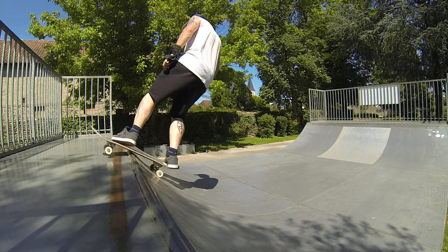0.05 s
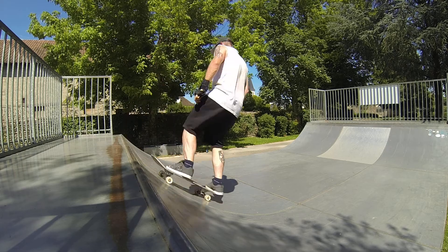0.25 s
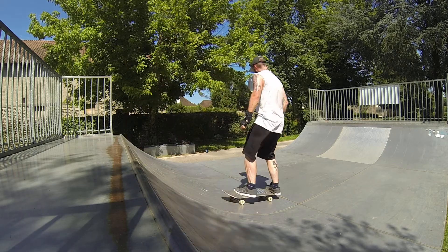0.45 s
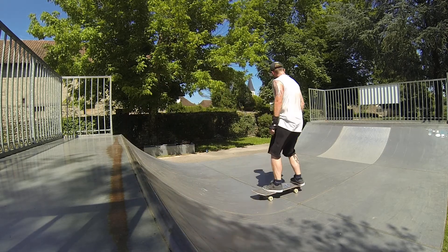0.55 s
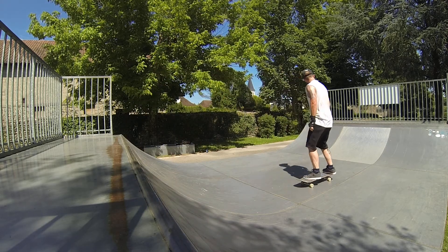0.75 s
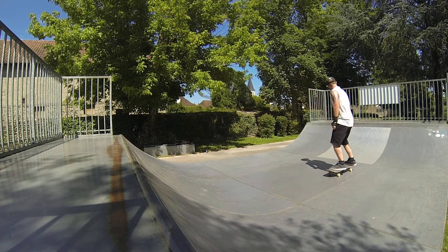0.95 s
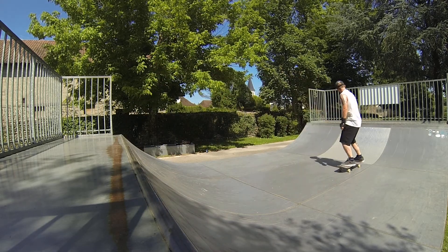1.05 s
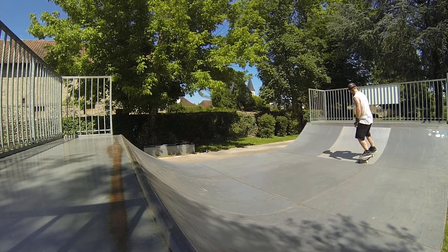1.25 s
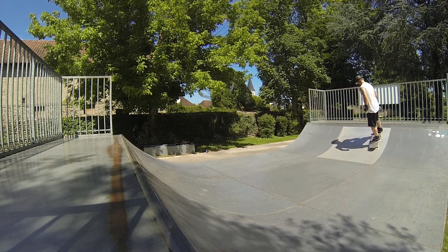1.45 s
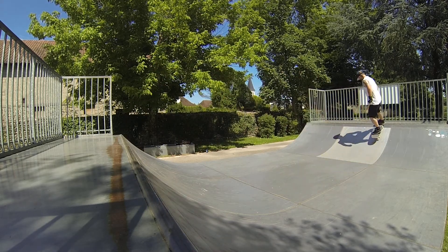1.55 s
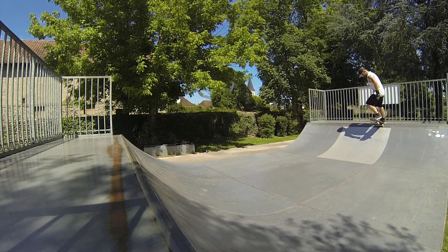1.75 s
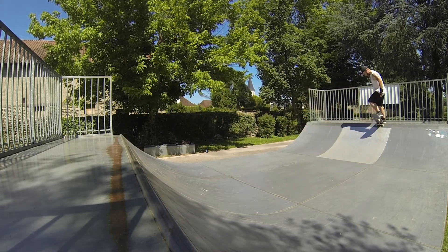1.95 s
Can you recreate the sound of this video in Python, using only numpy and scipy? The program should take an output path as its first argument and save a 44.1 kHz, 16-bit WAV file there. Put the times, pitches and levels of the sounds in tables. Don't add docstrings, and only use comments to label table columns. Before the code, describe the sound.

Skateboard wheels clack over a ramp edge, rumble and whine across the flat, knock and boom at two joints, then hit metal brightly before fading; outdoors with faint leaves, heard through a small camera microphone.

```python
import sys
import numpy as np
from scipy import signal
from scipy.io import wavfile

SR = 44100
rng = np.random.default_rng(int(sys.argv[2]) if len(sys.argv) > 2 else 0)


def ratio_of_db(decibels):
    return 10 ** (np.asarray(decibels, float) / 20)


def wav_record(signal):
    frames = np.transpose(np.atleast_2d(signal))
    bounded = np.clip(frames, -1, 1)
    quanta = np.round(bounded * 32767).astype(np.int16)
    wavfile.write(sys.argv[1], SR, quanta)


N = 88200


def at_hz(points, hz):
    p = np.array(points)
    return np.interp(np.log(hz), np.log(p[:, 0]), p[:, 1])


def in_time(s, values):
    return np.interp(np.arange(N) / SR, s, values)


def rms_one(x):
    return x / np.sqrt(np.mean(x ** 2) + 1e-20)


def band(x, low_hz, high_hz):
    return signal.sosfilt(signal.butter(2, [low_hz, high_hz], "band", fs=SR, output="sos"), x)


def drift(rate):
    r = np.exp(-80 * np.pi * rate / SR)
    noise = rng.standard_normal(N // 40 + 2002)
    slow = signal.lfilter([1], [1, -2 * r, r * r], noise)[2000:]
    return np.interp(np.arange(N) / 40, np.arange(len(slow)), rms_one(slow))


def ring(x, hz, t60):
    r, w = ratio_of_db(-60 / (t60 * SR)), 2 * np.pi * hz / SR
    return signal.lfilter([0, np.sin(w)], [1, -2 * r * np.cos(w), r * r], x + 1e-18)


def swell(clicks, fall_s, rise_s=.001):
    fall = signal.lfilter([1], [1, -np.exp(-1 / (fall_s * SR))], clicks + 1e-18)
    rise = np.exp(-1 / (rise_s * SR))
    return signal.lfilter([1 - rise], [1, -rise], fall)


def grit(rate, size_db):
    sizes = ratio_of_db(size_db * np.minimum(rng.exponential(1, N), 4))
    signs = rng.choice([-1, 1], N)
    happens = rng.random(N) < rate / SR
    return rms_one(rms_one(sizes * signs * happens) + rng.standard_normal(N))


def air():
    open_air = ratio_of_db(-90) * rms_one(band(rng.standard_normal(N), 403, 5700))
    leaves = ratio_of_db(-78) * rms_one(band(rng.standard_normal(N), 8000, 15000))
    return open_air + leaves


# delay [t/s], [level/dB]
ECHOES = [(0.018, -17.5), (.043, -22.5)]


def outdoors(x):
    dull, out = signal.lfilter([.4], [1, -.6], x), x.copy()
    for s, db in ECHOES:
        lag = int(s * SR)
        out[lag:] += ratio_of_db(db) * dull[:-lag]
    return out


# start [t/s], length [t/s], [level/dB], low [f/Hz], high [f/Hz]
SCUFFS = [
    (0.068, 0.013, -56, 1190, 5040),
    (0.112, .012, -61, 1500, 4330),
    (0.39, 0.032, -62, 7800, 12000),
    (1.046, 0.06, -58, 7980, 12800),
    (1.387, 0.033, -59, 7800, 12600),
    (1.537, 0.037, -52.5, 2500, 13000),
    (1.606, 0.03, -43, 1980, 4560),
    (1.623, 0.023, -36, 4400, 4960),
    (1.625, 0.021, -69, 7580, 13100),
]


def scuffs():
    out, source = 0, grit(3300, 1.1)
    for s, length, db, low_hz, high_hz in SCUFFS:
        times = [s, s + 0.26 * length, s + length, s + 1.1 * length]
        shape = in_time(times, [0.0099, 0.82, 0.25, 0.012])
        out = out + ratio_of_db(db) * shape * rms_one(band(source, low_hz, high_hz))
    return out


# [t/s], [f/Hz], [level/dB]
WHINE = [(.3, 1993, -28), (.425, 1980, -25), (.445, 1960, -15), (.51, 1890, -21), (.56, 1744, -25),
         (.62, 1660, -22.5), (.7, 1551, -22.5), (0.949, 1470, -22), (1.151, 1450, -30), (1.2, 1450, -43)]


def whine():
    s, hz, db = np.transpose(WHINE)
    wobble_hz = 60 * drift(SR / 200)
    phase = 2 * np.pi * np.cumsum(in_time(s, hz) + wobble_hz) / SR
    return ratio_of_db(in_time(s, db) + 4.6 * drift(40)) * np.sin(phase)


# [f/Hz], width [f/Hz], [level/dB], from [t/s], to [t/s]
RESONANCES = [(101.3, 21, -16.5, 0.2, 1.36), (4530, 600, -33.5, 0.63, 0.82), (435, 95, -4.5, 0.21, 0.32),
              (1120, 150, -15.5, 0.37, 0.49), (692, 79, -14.5, 0.86, 1.14), (3610, 350, -29.5, 0.69, 1.2),
              (5960, 440, -33, 0.37, 0.475), (6200, 510, -44, 0.45, 1.4), (10400, 630, -51, 0.31, 2.5),
              (2115, 360, -20, 1.12, 1.71), (3460, 490, -26.5, 1.48, 1.68), (1104, 400, -10.5, 1.658, 2.6)]


def singing():
    out = 0
    for hz, width_hz, db, start, end in RESONANCES:
        t60 = 1.5 / width_hz
        tone = rms_one(ring(ring(rng.standard_normal(N), hz, t60), hz, t60))
        shape = in_time([start - .04, start + 0.069, end - .02, end + 0.029], [0, 1, 1, 0])
        out = out + ratio_of_db(db + drift(12)) * shape * tone
    return out


# [f/Hz], [level/dB] per Hz
EDGE_COLOUR = [(25, -9), (70, 4), (150, -12.5), (300, -8.5), (1200, -22.5), (1700, -28), (2500, -30.5),
               (15000, -75)]
NEAR_COLOUR = [(25, -12), (85, -1), (350, -15), (1250, -28.5), (1650, -32.5), (2500, -43.5), (6500, -56.5),
               (15000, -64)]
FLAT_COLOUR = [(25, -14), (90, 2), (350, -11.5), (1200, -20.5), (1700, -33), (2600, -39.5), (6500, -53.5),
               (15000, -67.5)]
FAR_COLOUR = [(25, -20), (90, -2), (350, -4), (1200, -17), (1600, -42), (2500, -34), (6500, -55),
              (15000, -63)]
TOP_COLOUR = [(25, -29), (75, 1.5), (300, -21.5), (1200, -32), (1600, -33.5), (2500, -35.5), (6500, -55),
              (15000, -62)]
SURFACE_STARTS = [
    .22,
    .6,
    1.2,
    1.66,
]


def rolling():
    out, power, together, blend_s = 0, 0, drift(10.8), 0.055
    edges = 22 * 2 ** np.arange(0, 9.5, 1 / 3)
    source = [grit(3000, 3.5), grit(3000, 3.5)]
    colours = EDGE_COLOUR, NEAR_COLOUR, FLAT_COLOUR, FAR_COLOUR, TOP_COLOUR
    s = np.ravel([[t - blend_s, t + blend_s] for t in SURFACE_STARTS])
    for k, (low, high) in enumerate(zip(edges, edges[1:])):
        hz = np.sqrt(low * high)
        db = np.repeat([at_hz(colour, hz) for colour in colours], 2)[1:-1]
        gain = ratio_of_db(in_time(s, db))
        unevenness = ratio_of_db(.9 * together + 1.54 * drift(22))
        out = out + gain * unevenness * band(source[k % 2], low, high)
        power = power + gain ** 2 * (high - low) * 2 / SR
    return out / np.sqrt(power)


# [t/s], [level/dB]
WHEEL_LOAD = [(.06, -43), (.14, -40.5), (.21, -32), (.26, -25), (.42, -26), (.58, -25.5), (.75, -25.5),
              (1.0, -24.5), (1.14, -27.5), (1.24, -23.5), (1.36, -22.5), (1.5, -24.5), (1.66, -28),
              (1.8, -30.5), (2.0, -35)]


def wheels():
    s, db = np.transpose(WHEEL_LOAD)
    return ratio_of_db(in_time(s, db)) * (rolling() + singing() + whine())


# [t/s], [f/Hz], peak [level/dB], cycles
THUDS = [(.2352, 430, -3.5, 2.75), (0.2308, 4050, -28, 48), (.465, 190, -22.5, 5.2), (0.5319, 267, 0, 4.7),
         (0.6242, 490, -16, 5.8), (0.6369, 560, 0, 2.4), (0.646, 105, -12, 11), (0.681, 197, -14.5, 6.5),
         (0.996, 96, -18.5, 3.5), (1.1801, 527, -4, 3.8), (1.1869, 374, -5.5, 6.2), (1.239, 88, -18, 9.2),
         (1.2771, 149, -8.5, 5.6), (1.2984, 216, -2.5, 3.1), (1.6003, 620, -5, 4.6), (1.616, 2280, -26, 92),
         (1.639, 2050, -24, 40), (1.7336, 980, -9, 6.6)]


def thuds():
    out = 0
    for s, hz, db, cycles in THUDS:
        click = np.zeros(N)
        click[int(s * SR)] = -ratio_of_db(db + 3.5)
        out = out + band(ring(click, hz, cycles / hz), .3 * hz, 2.78 * hz)
    return out


def body(modes, s, db, offset_db, chatter):
    out, at, chatter_s = 0, (s * SR).astype(int), .003
    for hz, level_db, t60 in modes:
        luck = rng.standard_normal((len(s), 2))
        clicks, signs = np.zeros(N), np.zeros(N)
        clicks[at] = ratio_of_db(db + level_db + offset_db + 2.5 * luck[:, 0])
        signs[at] = np.where(luck[:, 1] > 1, 1, -1)
        shake = swell(clicks, chatter_s) * rng.standard_normal(N) * np.sqrt(2 / (chatter_s * SR))
        out = out + ring(clicks * signs + chatter * ratio_of_db(-8) * shake, hz, t60)
    return out


# [t/s], then knock, ramp boom, truck ring and crack, each [level/dB]
COPING_HITS = [(0.2194, -11, -52, -37, -38), (0.2225, -12.5, -54, -30, -33.5), (.2303, -5, -14.5, -28, -28),
               (.2348, -10, -25.5, -35, -38), (0.2403, -12.5, -57, -56, -42), (0.244, -4.5, -53, -42, -43),
               (0.253, -13.5, -50, -42, -52)]
NEAR_HITS = [(0.5205, -14, -17.5, -59, -32), (0.5225, -9, -44, -59, -29), (0.527, -4.5, -37, -57, -41),
             (0.5295, -7, -51, -52, -28), (0.6261, -12, -48, -49, -31), (0.63, -9, -43, -44, -27),
             (0.6366, -9.5, -16.5, -62, -25)]
FAR_HITS = [(1.1762, -18, -7.5, -40, -29), (1.1795, -3, -30, -32, -35), (1.185, -15.5, -52, -31, -27.5),
            (1.189, -7, -37, -22.5, -52), (1.1968, -9, -49, -27.5, -57), (1.2751, -12, -4.5, -32, -28),
            (1.2818, -6.5, -18, -29, -25.5), (1.2873, -5.5, -48, -18.5, -54), (1.297, -10, -39, -41, -62)]
PLATE_HITS = [(1.597, -8.5, -15, -25, -30.5), (1.5998, -0.5, -43, -9, -22.5), (1.6045, -18, -34, -28, -32),
              (1.609, -7, -47, -21.5, -37), (1.6153, -29, -31, -30, -40), (1.623, -18, -42, -28, -36),
              (1.631, -29, -41, -31, -39), (1.6391, -21.5, -55, -30, -48), (1.65, -20, -51, -33, -50)]
LIP_HITS = [(1.7325, -7, -55, -19.5, -28), (1.7365, -21, -50, -22, -63), (1.7395, -17.5, -47, -37, -56),
            (1.745, -20, -46, -36, -50)]
# [f/Hz], [level/dB], t60 [t/s]
COPING = [(287, 0, 0.035), (394, 1, 0.022), (495, 3.5, 0.043), (732, -5, 0.03), (1020, -7.5, 0.018),
          (1230, 0, 0.022), (1550, -12, .012), (1940, -7, .015)]
NEAR_DECK = [(200, 4, 0.044), (279.4, 1, 0.077), (443, -1.5, 0.036), (620, -1, 0.024), (716, 5, 0.0067),
             (980, 5, 0.022), (1130, 2, 0.037), (1396, -12, 0.042)]
FAR_DECK = [(265, -1.5, 0.034), (363, 1, 0.053), (514, -2.5, 0.027), (652, 1.5, 0.054), (766, -4, 0.028),
            (973, -2, 0.054), (1145, -6.5, 0.035), (1410, -34, 0.018)]
PLATE = [(375, -5.5, 0.033), (524, -3, .03), (735, -1.5, 0.052), (910, -8, 0.018), (1132, 1, 0.029),
         (1372, -11.5, 0.087)]
LIP = [(667, 8, 0.013), (840, -19, 0.0087), (1020, 0, 0.033), (1200, 3.5, 0.022), (1830, -2, 0.014)]
RAMP = [(88.6, -14.5, 0.5), (124.7, -3.5, 0.17), (147, -9.5, 0.072)]
TRUCK = [(2040, 2.5, .014), (2250, 3, 0.029), (2270, -10, 0.019), (2760, -4, 0.014), (3000, -15, .011),
         (3630, -10.5, 0.018), (3900, -25, .012)]
STEEL_TRUCK = [(2050, 3.5, 0.019), (2280, -9.5, 0.02), (2700, -2, 0.011), (3100, -12, .008),
               (3590, -4, 0.014), (3980, -10.5, 0.015)]
CRACK_BODY = [
    3,
    -5,
    -7.5,
    3,
    7.5,
]
CRACK_LOW = [
    1960,
    3300,
    2760,
    1960,
    1960,
]


def clacks():
    places = [(COPING_HITS, COPING, TRUCK), (NEAR_HITS, NEAR_DECK, TRUCK), (FAR_HITS, FAR_DECK, TRUCK),
              (PLATE_HITS, PLATE, STEEL_TRUCK), (LIP_HITS, LIP, STEEL_TRUCK)]
    knock = boom = truck = crack = 0
    for (hits, modes, metal), crack_body_db, low_hz in zip(places, CRACK_BODY, CRACK_LOW):
        s, knock_db, boom_db, truck_db, crack_db = np.transpose(hits)
        clicks = np.zeros(N)
        clicks[(s * SR).astype(int)] = ratio_of_db(crack_db + 4.5)
        shape = swell(clicks, 0.0022) + ratio_of_db(-28.5) * swell(clicks, 0.052)
        burst = shape * rng.standard_normal(N)
        crack = crack + ratio_of_db(crack_body_db) * band(burst, low_hz, 5790)
        crack = crack + ratio_of_db(-10) * band(burst, 4300, 11950)
        boom = boom + body(RAMP, s, boom_db, 1.7, 0)
        knock = knock + body(modes, s, knock_db, -9, 1.0)
        truck = truck + body(metal, s, truck_db, -1.9, 2.05)
    knock = band(band(knock, 182, 1500), 51, 1.7 * 1500)
    boom = band(boom, 72, 500)
    truck = band(band(truck, 1770, 4000), 1760, 5700)
    return knock + boom + truck + crack + thuds()


def scene():
    return (air() + wheels() + outdoors(clacks() + scuffs()))[None]


def roll_off(x):
    return signal.sosfilt(signal.butter(12, 15320, fs=SR, output="sos"), x)


def record(dry):
    notch_hz, notch_width_hz = 7450, 600
    b, a = signal.iirnotch(notch_hz, notch_hz / notch_width_hz, SR)
    x = dry - 0.58 * (dry - signal.lfilter(b, a, dry))
    x = band(x, 28, 10200)
    start_s, fade_s = 0.0566, 0.0018
    x = 1.162 * np.tanh(x / 1.282) * in_time([start_s, start_s + fade_s], [0, 1])
    x = signal.sosfilt(signal.cheby2(10, 30, 15700, fs=SR, output="sos"), x)
    return roll_off(x)


dry = scene()
out = record(dry)
wav_record(out)
```